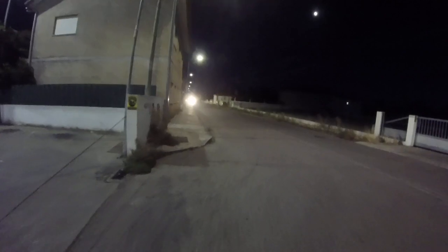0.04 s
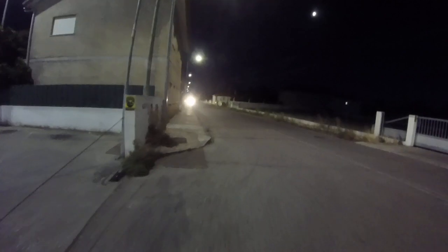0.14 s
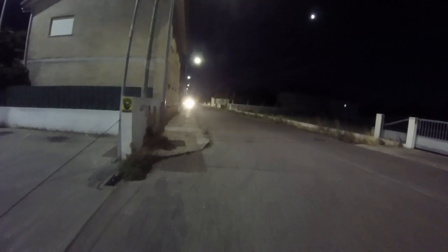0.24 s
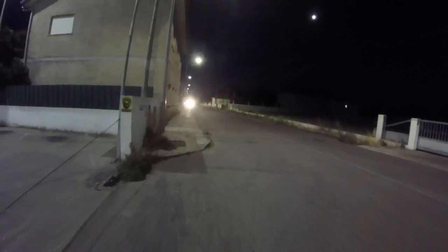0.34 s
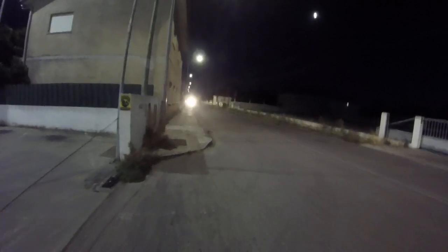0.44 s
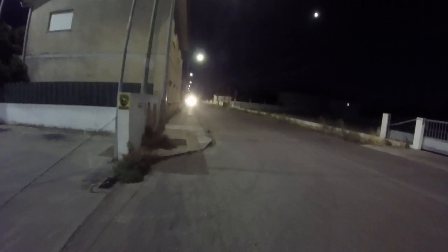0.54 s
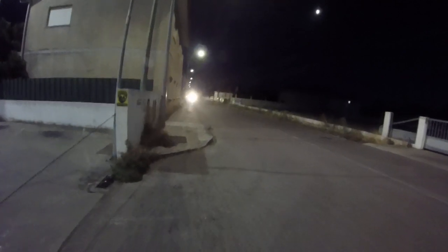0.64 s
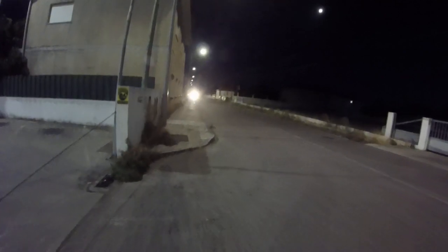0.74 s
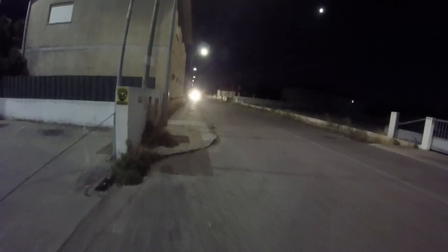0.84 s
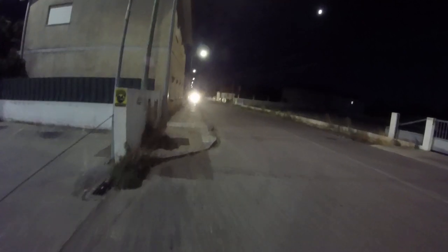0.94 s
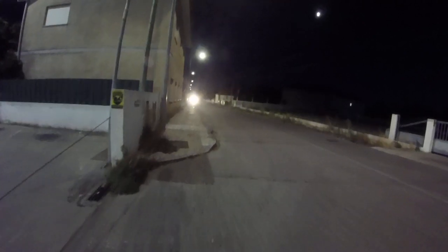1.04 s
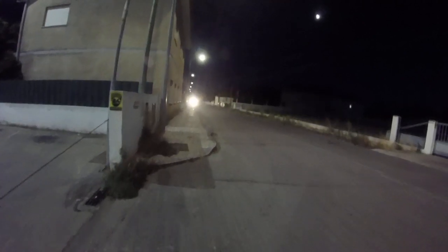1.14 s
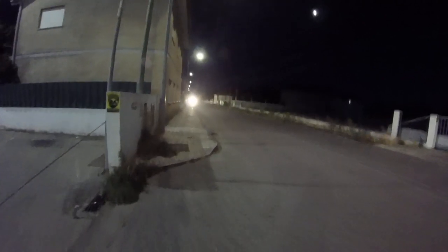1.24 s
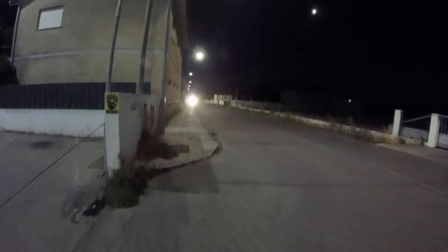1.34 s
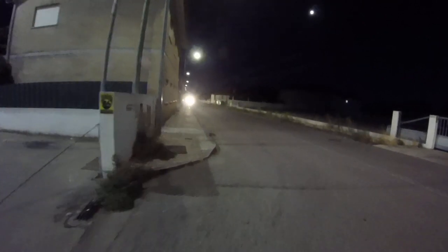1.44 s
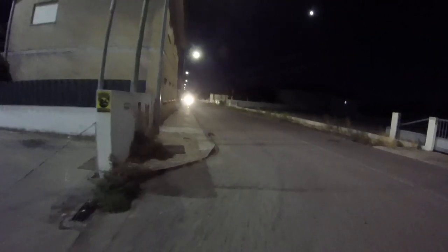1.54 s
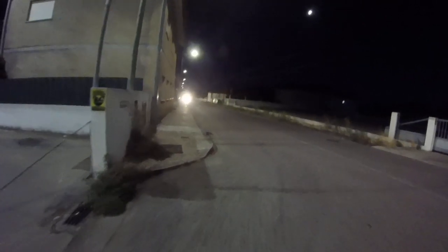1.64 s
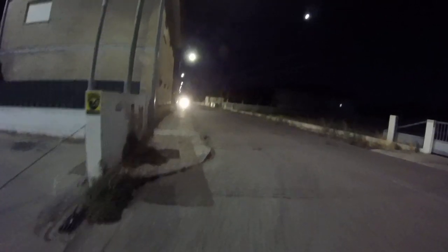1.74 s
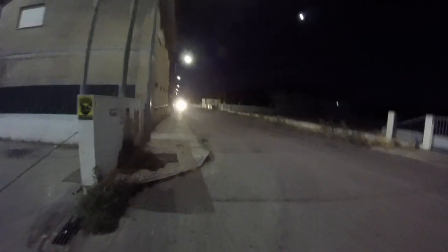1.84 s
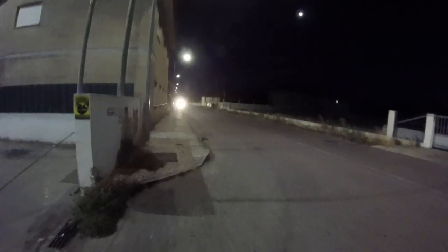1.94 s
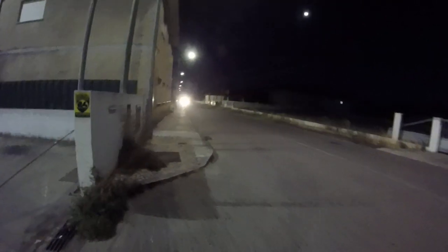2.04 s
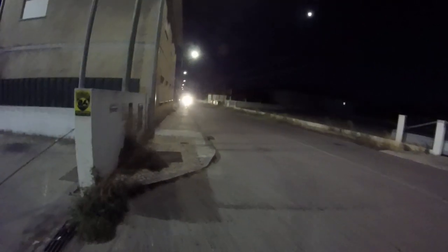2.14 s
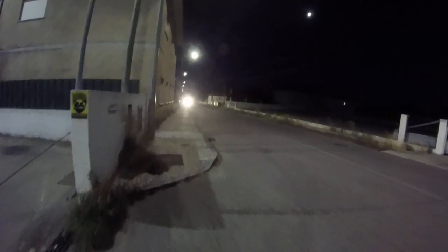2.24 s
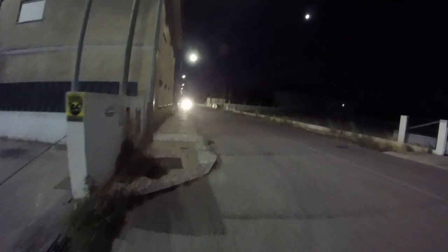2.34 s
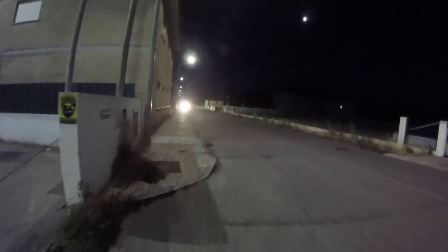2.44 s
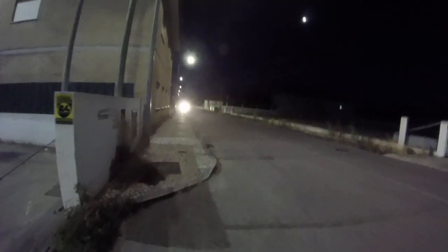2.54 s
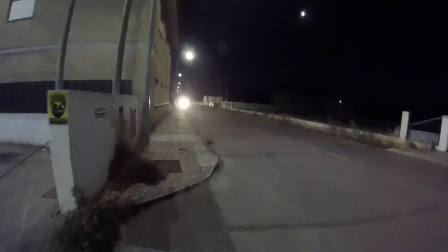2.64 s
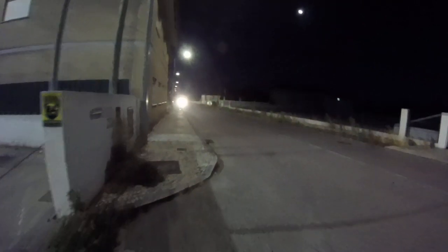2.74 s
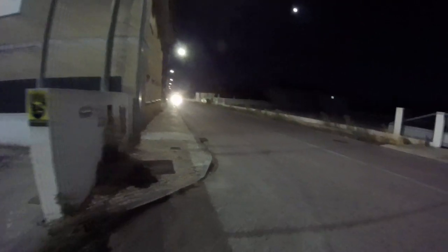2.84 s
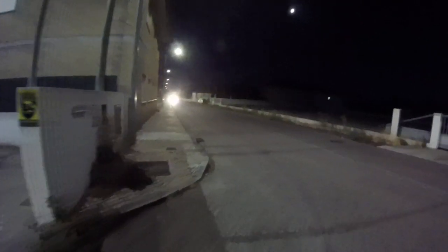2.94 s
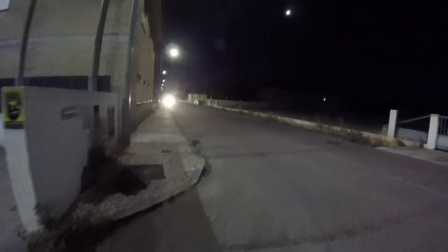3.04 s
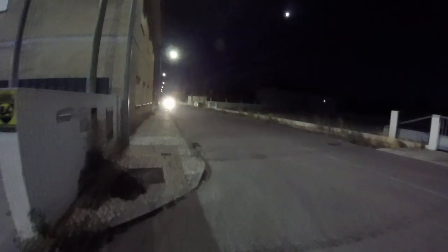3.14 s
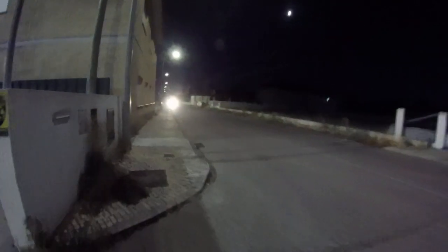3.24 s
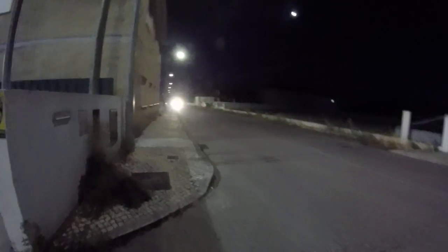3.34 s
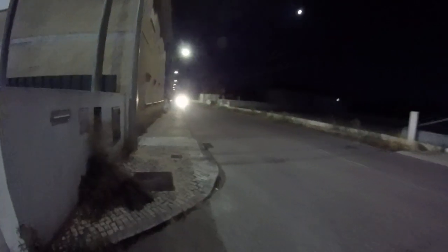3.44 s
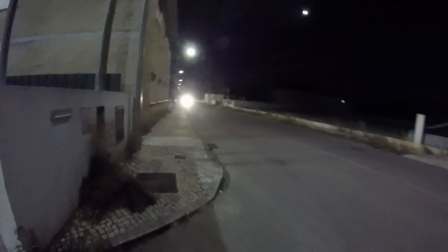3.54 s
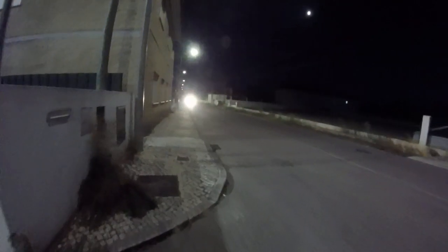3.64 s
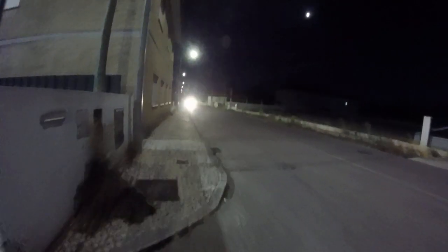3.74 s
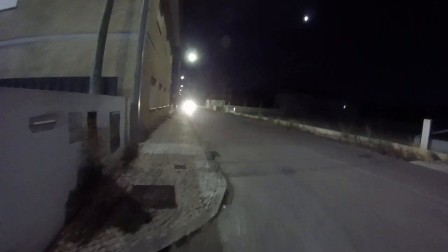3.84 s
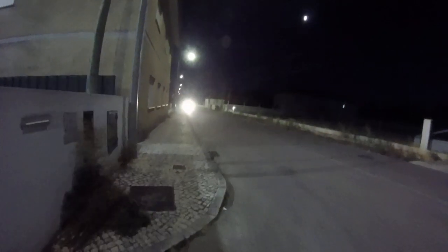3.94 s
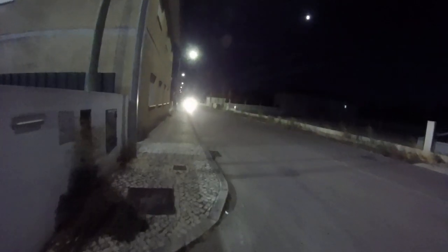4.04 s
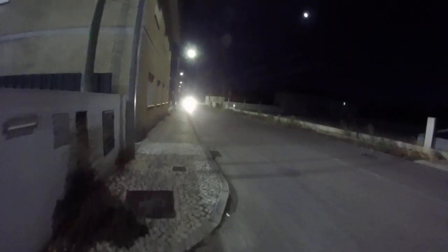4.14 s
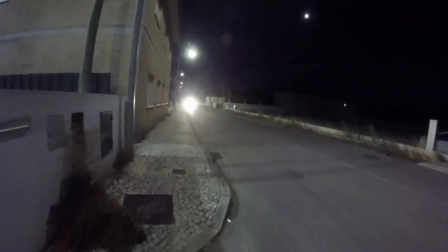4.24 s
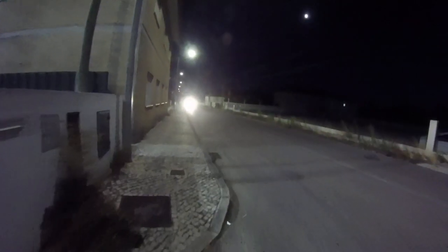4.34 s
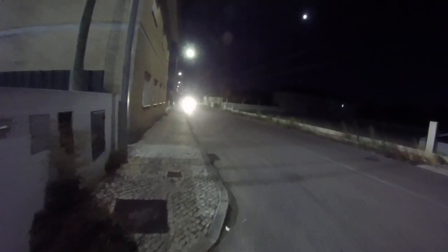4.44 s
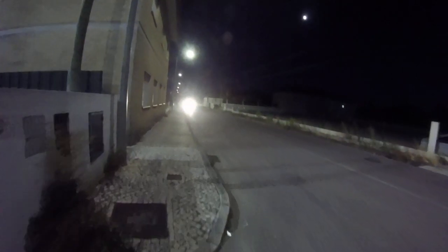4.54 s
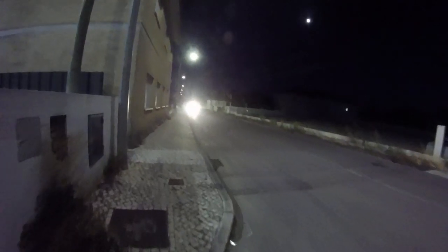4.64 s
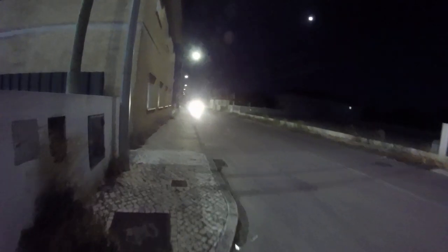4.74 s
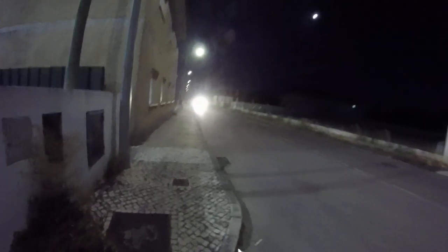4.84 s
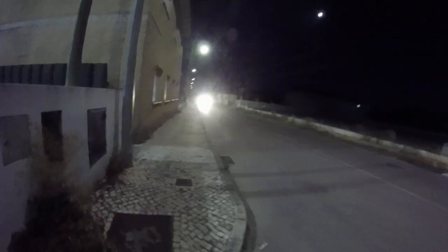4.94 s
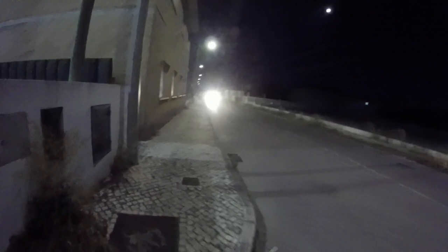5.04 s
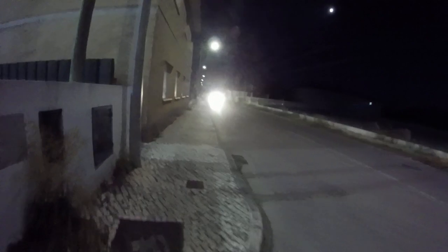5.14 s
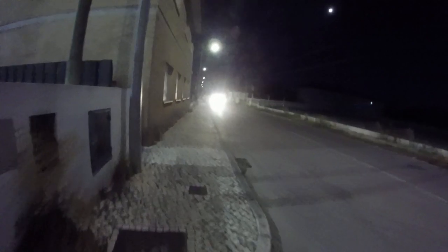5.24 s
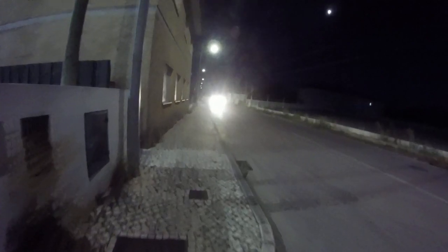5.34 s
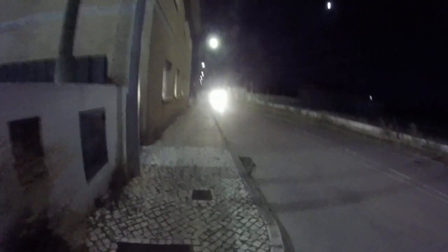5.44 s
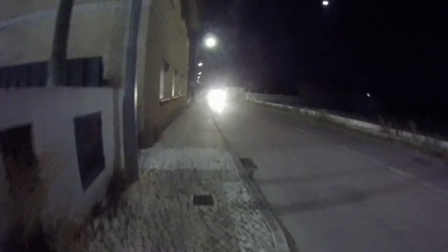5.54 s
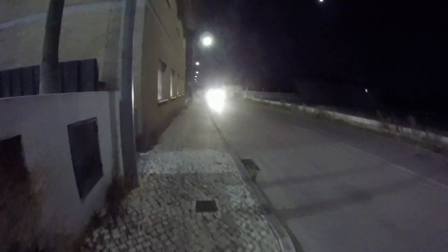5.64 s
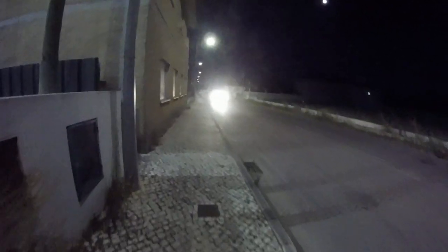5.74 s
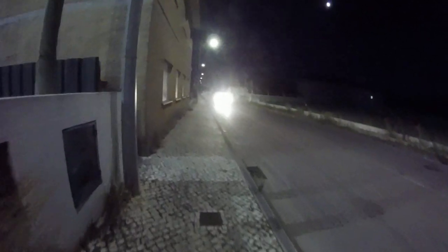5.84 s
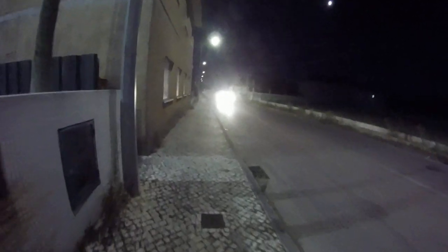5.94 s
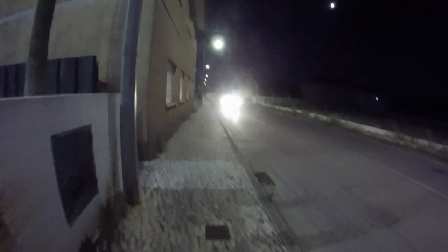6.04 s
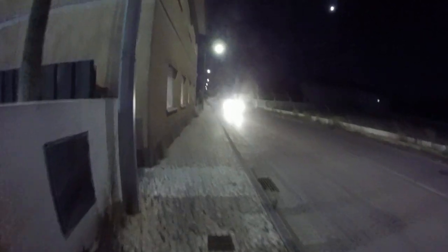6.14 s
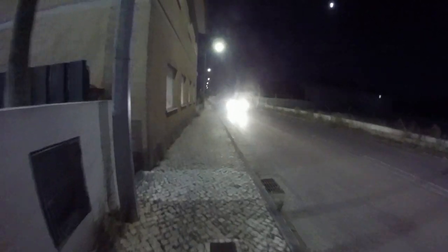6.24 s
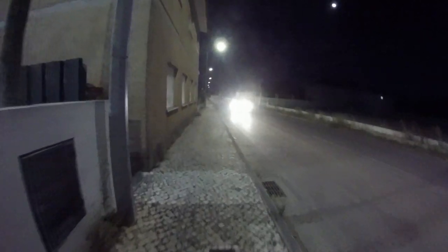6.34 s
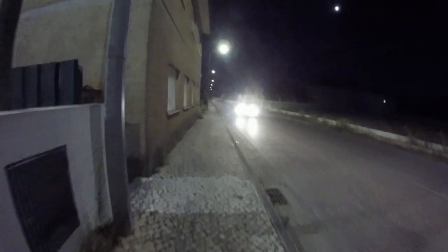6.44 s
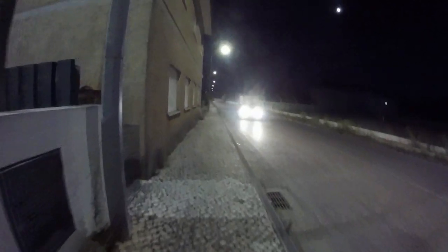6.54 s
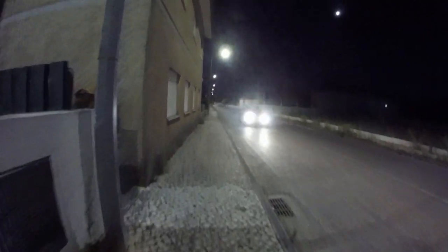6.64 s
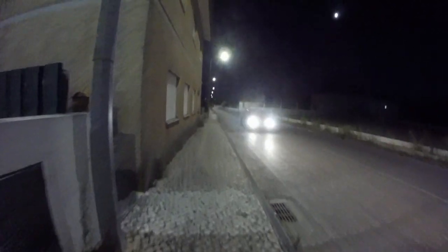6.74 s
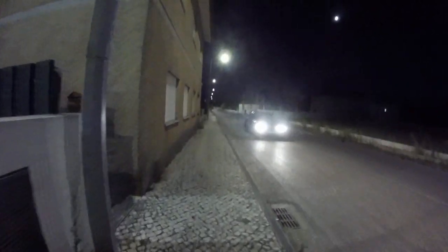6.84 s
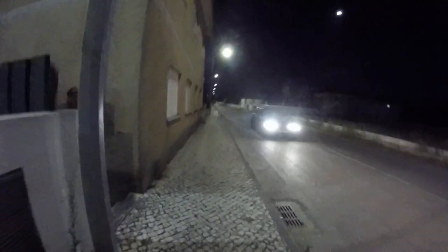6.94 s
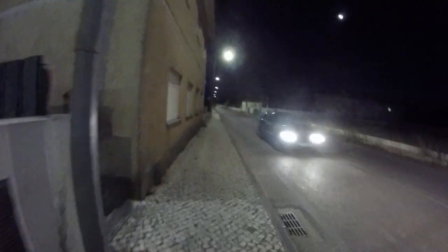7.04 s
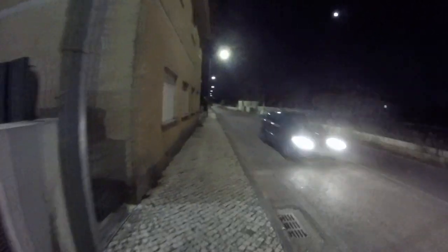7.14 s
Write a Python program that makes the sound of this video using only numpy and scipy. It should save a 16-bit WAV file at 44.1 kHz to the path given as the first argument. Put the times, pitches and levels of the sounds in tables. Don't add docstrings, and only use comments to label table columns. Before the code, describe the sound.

At first a night street is very quiet: faint town hum, thin steady hiss, light low puffs of wind and the barely audible far-off roll of a car. From about 3 s wind begins to rumble on the small camera's microphone, becoming continuous buffeting from 3.6 s. Between roughly 4.9 and 5.6 s the gusts peak in violent irregular thumps, flutter and a rough crack, slightly overloaded, covering most else. They fall away by about 5.8 s, exposing the approaching car: broad tyre roar, a noisy whine around the upper middle range and a low engine hum. Another short gust bumps near 6.5 s. From 6.3 s quick dull belt knocks join as tyres meet the road surface. The roar gets brighter, fuller and rapidly louder through 7 s, with some low wind underneath, and stops abruptly just before the car passes.

```python
import sys
import numpy as np
from scipy import signal
from scipy.fft import rfft, irfft, next_fast_len
from scipy.io import wavfile
from scipy.ndimage import uniform_filter1d

SR = 44100
rng = np.random.default_rng(int(sys.argv[2]) if len(sys.argv) > 2 else 0)


def how_loud(loudness_db):
    steps = np.asarray(loudness_db, float) / 20
    return 10 ** steps


def output_pcm(signal):
    pcm = np.clip(np.atleast_2d(signal).T, -1, 1) * 32767
    wavfile.write(sys.argv[1], SR, np.round(pcm).astype(np.int16))


N = 317079
T = np.arange(N) / SR
HZ = np.fft.rfftfreq(N, 1 / SR) + 1e-3


def walk(rate):
    hold = int(SR / rate)
    steps = np.repeat(rng.standard_normal(N // hold + 1), hold)
    return 0.98 * uniform_filter1d(uniform_filter1d(steps, hold), hold)[:N]


def bands(source, colour):
    hz, db = np.transpose(colour)
    gain = how_loud(np.interp(np.log(HZ), np.log(hz), db, right=-200))
    spectrum = rfft(source) * gain * (HZ > 0.7 * hz[0])
    spectrum /= np.std(irfft(spectrum, N))
    octave = np.log2(np.clip(HZ, 31.25, 16000) / 31.25)
    return [(31.25 * 2 ** k, irfft(spectrum * np.clip(1 - abs(octave - k), 0, 1), N)) for k in range(10)]


def coloured_noise(colour):
    return sum(x for hz, x in bands(rng.standard_normal(N), colour))


def narrow_noise(hz, width_hz):
    envelope = np.exp(-(np.fft.fftfreq(N, 1 / SR) / width_hz) ** 2)
    random_phase = np.exp(2j * np.pi * rng.random(N))
    slow = np.fft.ifft(np.fft.fft(rng.standard_normal(N)) * envelope * random_phase)
    x = np.real(slow * np.exp(2j * np.pi * np.cumsum(hz + 0 * T) / SR))
    return x / x.std()


SPEED_M_S, PASSES_S, KERB_M = 11.53, 7.913, 1.1


def car_distance():
    return np.hypot(SPEED_M_S * (T - PASSES_S), KERB_M)


def roar_level():
    at_1m_db, ground_db_per_m = -3, 0.2179
    metres = car_distance()
    return at_1m_db - 20 * np.log10(metres) - ground_db_per_m * metres


def nearness():
    roar_db = roar_level()
    return roar_db - roar_db.max()


def road_echo():
    peak_db, at_m, span_m = 5.5, 24.7, 17.3
    return peak_db * np.exp(-((car_distance() - at_m) / span_m) ** 2)


# f/Hz, density/dB per Hz
TYRE_COLOUR = [(40, 1.5), (100, -21), (250, -1.5), (450, -9.5), (800, -3.5), (1200, -18.5), (2000, -23),
               (2800, -33), (4000, -40), (6000, -41.5), (9000, -57), (11000, -55), (13500, -61),
               (15200, -68)]


def tyres():
    air_loss_db, whine_db = 0.75, -0.5
    roar_db, echo_db = roar_level(), road_echo()
    distance = how_loud(-nearness())
    road = walk(1.1)
    out = 0
    for hz, x in bands(rng.standard_normal(N), TYRE_COLOUR):
        absorption_db = air_loss_db * distance * (hz / 8200.0) ** 0.75
        db = roar_db + 2.5 - absorption_db + 0.067 * road + 1.6 * walk(13.0)
        db = db - echo_db * np.exp(-np.log2(hz / 700) ** 2 / 0.73)
        db = db + (whine_db + echo_db) * np.exp(-np.log2(hz / 2000) ** 2 / 0.095)
        out = out + x * how_loud(db)
    return out


# t/s, level/dB, f/Hz
WHINE_TRACK = [(2.6, -80, 1980), (2.71, -66, 2052), (3.35, -55, 1990), (3.48, -62, 2020), (3.62, -52, 1982),
               (4.21, -65.5, 1969), (4.71, -49, 2062), (5.02, -45.5, 2080), (5.19, -50, 1990),
               (5.6, -39, 1963), (5.69, -45, 1986), (5.73, -38, 1980), (6.31, -39, 1890),
               (6.56, -36.5, 1967), (6.89, -34, 1954), (6.96, -34, 1865), (7.14, -32, 2065),
               (7.19, -39, 1958)]


def whine():
    s, db, hz = np.transpose(WHINE_TRACK)
    level_db = np.interp(T, s, db) - 6 * np.clip(s[0] - T, 0, None)
    width_hz, trim_db = 248, -1.5
    return narrow_noise(np.interp(T, s, hz), width_hz) * how_loud(level_db + trim_db + 0.78 * walk(12.0))


def centre_rib():
    hz, width_hz, level_db, at_m, span_m = 4480, 230, -62, 14.5, 3.2
    beam = np.exp(-((car_distance() - at_m) / span_m) ** 2)
    return narrow_noise(hz, width_hz) * how_loud(level_db + 1.5 * walk(14.0)) * beam


# f/Hz, density/dB per Hz
GROOVE_COLOUR = [(2700, -28), (3050, -1), (3300, 4), (3550, -7), (3900, -28)]


def grooves():
    level_db, rise_hz = -48.5, 298
    near_db = nearness()
    shift_hz = rise_hz * (how_loud(3.0 * near_db) - 0.4)
    climb = np.exp(2j * np.pi * np.cumsum(shift_hz) / SR)
    analytic = signal.hilbert(coloured_noise(GROOVE_COLOUR), next_fast_len(N))[:N]
    return np.real(analytic * climb) * how_loud(level_db + 1.57 * near_db + 0.37 * walk(23.0))


# f/Hz, density/dB per Hz
SHOULDER_COLOUR = [(1100, -23), (1400, -0.5), (1750, 1), (1950, -12), (2200, -31)]


def shoulder():
    return how_loud(-32 + 1.43 * nearness() + 0.47 * walk(7.4)) * coloured_noise(SHOULDER_COLOUR)


# f/Hz, density/dB per Hz
BELT_COLOUR = [(450, -20), (560, -11), (640, 8.5), (720, -6.5), (880, -6), (980, -27)]


def belt():
    return how_loud(-36.5 + 1.15 * nearness() + 1.7 * walk(7.7)) * coloured_noise(BELT_COLOUR)


# t/s, peak level/dB, ring f/Hz
SEAM_HITS = [(6.258, -27.5, 670), (6.347, -27, 678), (6.559, -18.5, 757), (6.608, -20.5, 676),
             (6.657, -23, 619), (6.712, -23, 609.6), (6.755, -14.5, 654), (6.843, -21.5, 651),
             (6.894, -23, 702), (6.943, -17.5, 673), (6.983, -16.5, 754), (7.061, -25, 642.7),
             (7.141, -19, 712), (7.172, -17, 692)]


def seams():
    rise_s, trim_db = 0.0067, -4
    out = 0
    for (s, db, hz), turn in zip(SEAM_HITS, rng.random(len(SEAM_HITS))):
        age = np.clip(T - s, 0, None) / rise_s
        out = out + how_loud(db + trim_db) * age * np.exp(1 - age) * np.sin(2 * np.pi * (hz * T + turn))
    return out


# multiple of the firing rate, level/dB
ORDERS = [(1, 0), (2, -13), (3, -9.5), (4, -14), (4.5, -15), (5, -17)]


def engine():
    firing_hz, nearest_db, slope = 56.77, -25.5, 1.24
    phase = 2 * np.pi * np.cumsum(firing_hz * (1 + 0.008 * walk(6.0))) / SR
    out = 0
    for order, db in ORDERS:
        tone = np.sin(order * phase + rng.uniform(0, 7.45))
        out = out + np.sqrt(2) * how_loud(db + 1.36 * walk(7.0)) * tone
    return how_loud(nearest_db + slope * nearness()) * out


# peak t/s, buffet level/dB, length t/s, flutter level/dB
GUST_EVENTS = [(.5, -53, 0.49, -59), (1.067, -44, 0.056, -67), (2.07, -49.5, 0.21, -58),
               (2.288, -49, 0.066, -58), (2.44, -49, 0.15, -56), (2.938, -38.5, 0.22, -54),
               (3.085, -45, 0.091, -49), (3.21, -46, 0.081, -48), (3.282, -45, 0.041, -47.5),
               (3.43, -50, 0.14, -51), (3.652, -31, 0.11, -43), (3.781, -29.5, 0.029, -39),
               (3.913, -29.5, 0.17, -39), (4.07, -29.5, 0.071, -39), (4.126, -30, .04, -39),
               (4.162, -31, .05, -39), (4.212, -30, .03, -40.5), (4.278, -30.5, 0.028, -35.5),
               (4.325, -25, 0.038, -31), (4.377, -28.5, 0.051, -36.5), (4.422, -28, 0.031, -39),
               (4.641, -27, 0.036, -38.5), (4.797, -32.5, 0.11, -36), (4.912, -20.5, 0.018, -27.5),
               (4.951, -21, 0.028, -27), (4.994, -22.5, 0.02, -34), (5.026, -28, 0.034, -28.5),
               (5.086, -16.5, 0.017, -20.5), (5.136, -17, 0.042, -19.5), (5.178, -19, 0.022, -15),
               (5.232, -16, 0.027, -23), (5.273, -16, 0.066, -20), (5.347, -18, 0.053, -22.5),
               (5.385, -22, 0.031, -24), (5.43, -22.5, .05, -32), (5.524, -17.5, 0.13, -30),
               (5.64, -29, 0.051, -43), (5.68, -25, 0.037, -39), (5.717, -29, 0.022, -28),
               (5.76, -31, 0.04, -29.5), (6.132, -34, 0.28, -48), (6.509, -23.5, 0.059, -37),
               (7.173, -25, 0.45, -47)]


def gusts():
    rise, drop_db = 0.81, 10
    deep, flutter = how_loud(2 * -55.5), how_loud(2 * -67.5)
    for s, deep_db, length, flutter_db in GUST_EVENTS:
        shape = how_loud(-2 * drop_db * np.maximum(T - s, (s - T) / rise) / length)
        deep = deep + how_loud(2 * deep_db) * shape
        flutter = flutter + how_loud(2 * flutter_db) * shape
    return 10 * np.log10(deep), 10 * np.log10(flutter)


def eddies(rate, spread_db):
    hit = rng.random(N) < rate / SR
    return hit * np.sign(rng.standard_normal(N)) * how_loud(spread_db * rng.exponential(size=N))


# f/Hz, density/dB per Hz
BUFFET_COLOUR = [(18, 1), (35, 4), (60, 2), (100, 0.5), (160, -5.5), (250, -18.5), (400, -49)]
# f/Hz, density/dB per Hz
FLUTTER_COLOUR = [(80, -24), (160, 1), (250, -1.5), (450, -5.5), (750, -10), (950, -60), (1600, -70),
                  (2200, -39)]
# f/Hz, density/dB per Hz
SWAY_COLOUR = [(9, -9.5), (16, 1.5), (24, -8), (34, -15)]


def wind():
    deep_db, flutter_db = gusts()
    puff = walk(25.0)
    deep = sum(x * how_loud(0.96 * walk(4.55)) for hz, x in bands(eddies(500.0, 0.92), BUFFET_COLOUR))
    tilt_db = 0.51 * (flutter_db + 22.0)
    flutter = 0
    for hz, x in bands(eddies(2500.0, 1.03), FLUTTER_COLOUR):
        flutter = flutter + x * how_loud(tilt_db * max(np.log2(hz / 250), 0))
    sway = coloured_noise(SWAY_COLOUR) * how_loud(uniform_filter1d(deep_db, size=4000) - 5.5)
    buffet = deep * how_loud(deep_db - 3.0 + 0.88 * puff)
    return sway + buffet + flutter * how_loud(flutter_db + 1.6 * puff)


# t/s, peak level/dB, width t/s, sign (+1 push, -1 suction)
BIG_EDDIES = [(2.28, -29.5, 0.0082, 1), (2.915, -30, 0.019, 1), (3.005, -32, 0.011, -1),
              (3.408, -30.5, .012, -1), (3.455, -31.5, 0.015, 1), (3.688, -25.5, 0.016, -1),
              (3.773, -26, 0.018, -1), (3.797, -25, 0.0065, 1), (3.918, -24, 0.008, 1),
              (4.073, -22, 0.011, 1), (4.153, -28, 0.0083, -1), (4.212, -23, 0.0046, 1),
              (4.34, -25, 0.0078, -1), (4.429, -22.5, 0.01, 1), (4.644, -22.5, 0.01, 1),
              (4.784, -23, 0.014, 1), (4.91, -20, 0.00884, 1), (4.97, -14.5, 0.0063, -1),
              (5.017, -21, 0.0071, -1), (5.066, -12.5, 0.0068, -1), (5.086, -4, 0.0059, -1),
              (5.096, -9, 0.022, 1), (5.114, -7.5, 0.016, -1), (5.131, -14, 0.016, 1),
              (5.136, -6, 0.0034, 1), (5.148, -14.5, 0.0073, -1), (5.188, -9.5, 0.0081, 1),
              (5.178, -7, 0.0066, -1), (5.207, -9, 0.009, -1), (5.216, -2.5, 0.0029, -1),
              (5.266, -13, 0.0058, -1), (5.307, -9.5, 0.0062, -1), (5.317, -11.5, .008, 1),
              (5.349, -15, 0.0042, -1), (5.431, -15, 0.0071, -1), (5.497, -12.5, 0.017, 1),
              (5.526, -8.5, 0.0061, -1), (5.557, -12.5, 0.012, -1), (5.63, -14.5, 0.0067, 1),
              (6.466, -23, 0.0071, -1), (6.476, -23, 0.011, 1), (6.486, -21, 0.0081, -1),
              (6.455, -26, .01, 1), (6.493, -24, 0.01, 1), (6.502, -26, 0.0055, -1),
              (6.513, -21, 0.0043, -1), (6.545, -26, .012, 1), (6.533, -19.5, .011, -1)]


def thumps():
    rebound, rebound_width = 0.33, 3.3
    out = 0
    for s, db, width, sign in BIG_EDDIES:
        age = (T - s) / (0.52 * width)
        bump = np.exp(-age ** 2) - rebound * np.exp(-((age - 0.8) / rebound_width) ** 2)
        out = out + np.sign(sign) * how_loud(db) * bump / 0.89
    return out


# t/s, level/dB, f/Hz, width f/Hz, length t/s
GRIT_BURSTS = [
    (.5816, -67, 7500, 1500, .005),
    (6.543, -68, 11500, 3800, .024),
    (5.174, -41, 1150, 400, .009),
]


def grit():
    out = 0
    for s, db, hz, width_hz, length in GRIT_BURSTS:
        x = irfft(rfft(rng.standard_normal(N)) * np.exp(-((HZ - hz) / width_hz) ** 2), N)
        age = np.clip(T - s, 0, None) / length
        out = out + how_loud(db) * x / x.std() * age * np.exp(1 - age * age)
    return out


# f/Hz, density/dB per Hz
NIGHT_COLOUR = [(20, -8.5), (55, 0), (120, -7.5), (200, -5.5), (350, -6), (700, -11.5), (1200, -17.5),
                (2000, -22.5), (3000, -30), (4500, -31.5), (6500, -42.5), (9000, -52)]


def night():
    out = 0
    for hz, x in bands(rng.standard_normal(N), NIGHT_COLOUR):
        out = out + x * how_loud(0.27 * walk(1.2) + 1.8 * walk(11.0))
    return how_loud(-49) * out


# f/Hz, density/dB per Hz
HISS_COLOUR = [(2500, -12), (4000, -6), (5500, -3), (7000, -4), (9000, -9), (11000, -13), (13500, -16),
               (15100, -20), (15300, -40)]


def input_hiss():
    return how_loud(-70.5) * coloured_noise(HISS_COLOUR)


# f/Hz, width f/Hz, lift/dB
HOUSING_MODES = [(692, 124, 9), (1440, 930, -3), (2060, 595, 9), (2580, 250, 1.5), (2940, 140, -0.5),
                 (3270, 850, 4), (4070, 320, -3), (4350, 670, 4), (6430, 610, 6), (8820, 2130, 14),
                 (12100, 1100, 5)]


def through_housing(x):
    lift_db = sum(db / (1 + (2 * (HZ - hz) / width_hz) ** 2) for hz, width_hz, db in HOUSING_MODES)
    response = np.roll(irfft(how_loud(lift_db - 3), N), 1024)[:2049]
    return signal.fftconvolve(x, response * np.hanning(len(response)), "same")


def scene():
    air = through_housing(tyres() + grooves() + shoulder() + belt() + night())
    tones = whine() + centre_rib() + seams() + engine()
    return (air + tones + wind() + thumps() + grit())[None]


def roll_off(x):
    return signal.sosfilt(signal.butter(12, 15570, fs=SR, output="sos"), x)


def record(dry):
    stop = np.sin(np.pi / 2 * np.clip((T[-1] - T) / 0.005, 0, 1)) ** 2
    mix = 0.81 * np.tanh((dry + input_hiss()) / 0.74) * stop
    return roll_off(mix)


dry = scene()
out = record(dry)
output_pcm(out)
```